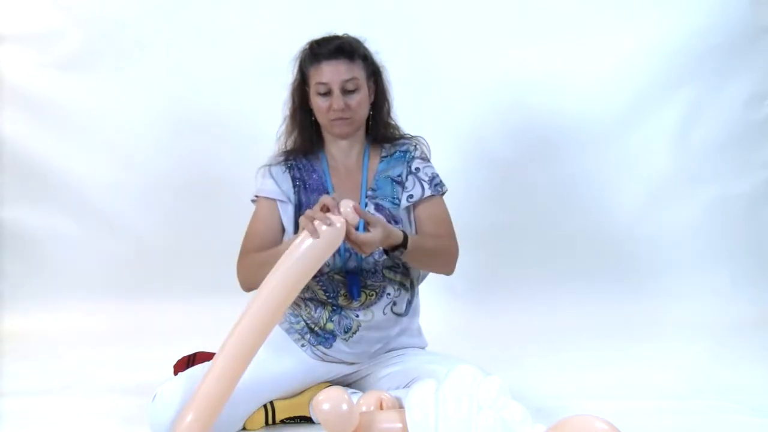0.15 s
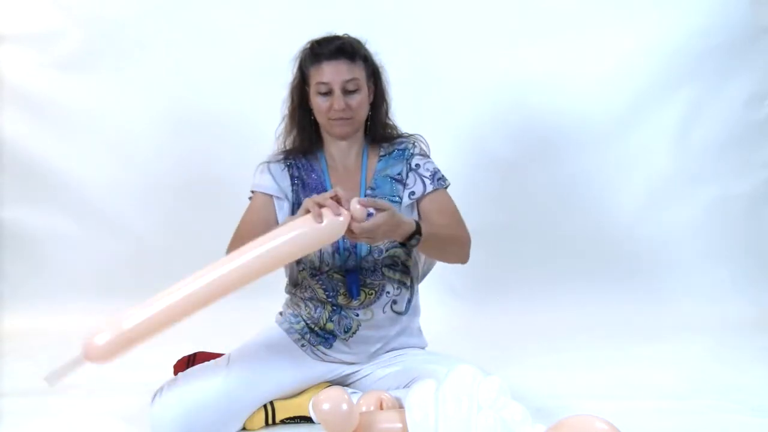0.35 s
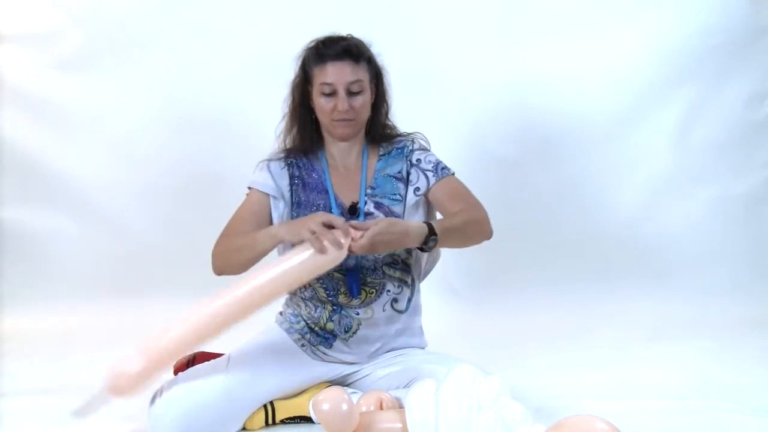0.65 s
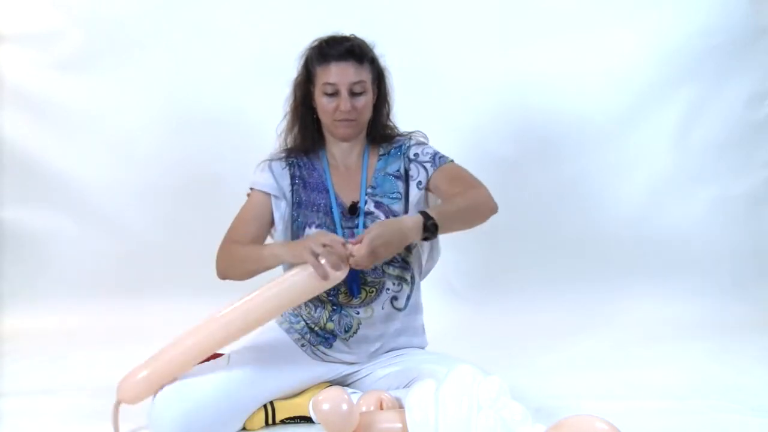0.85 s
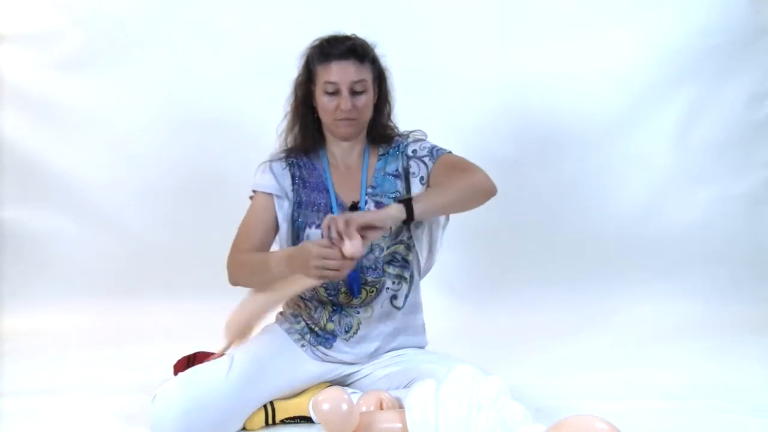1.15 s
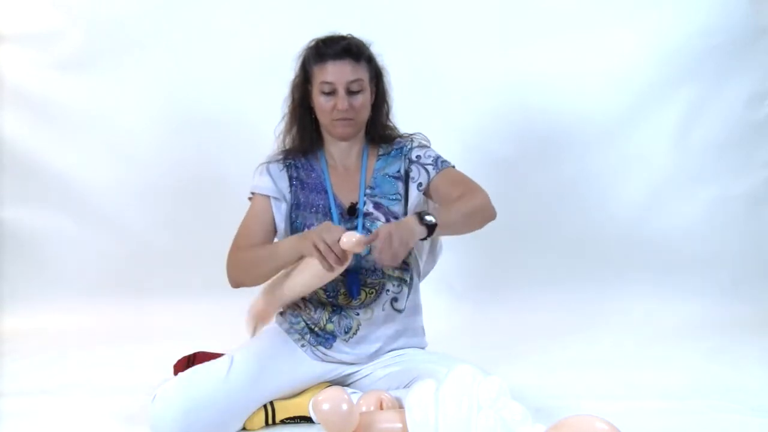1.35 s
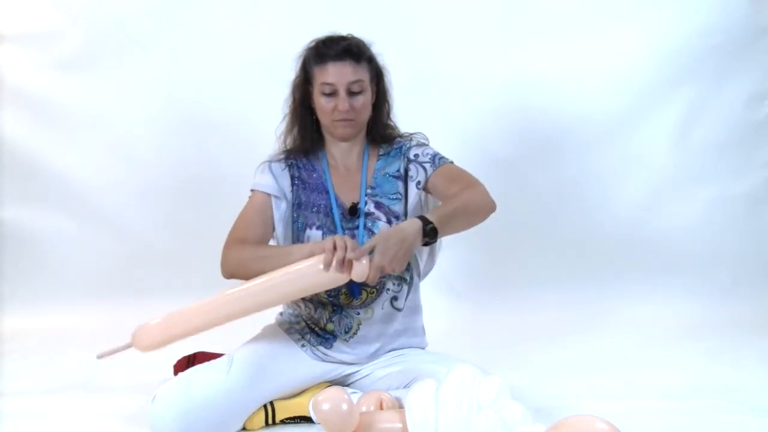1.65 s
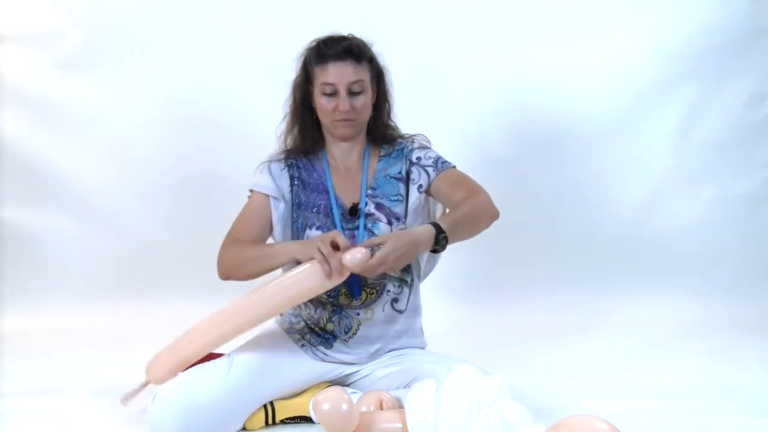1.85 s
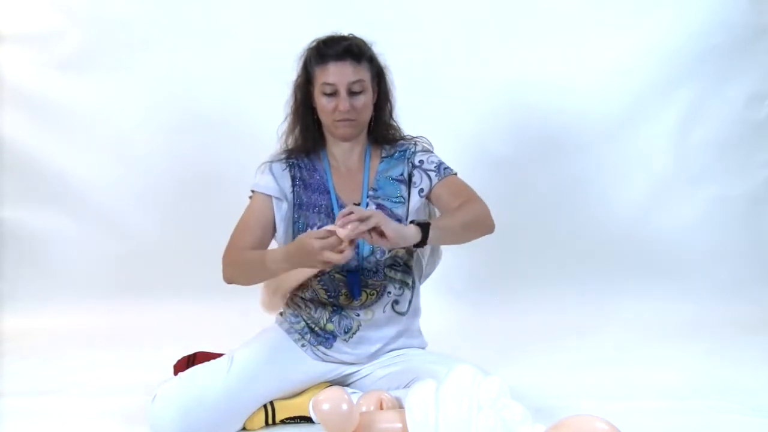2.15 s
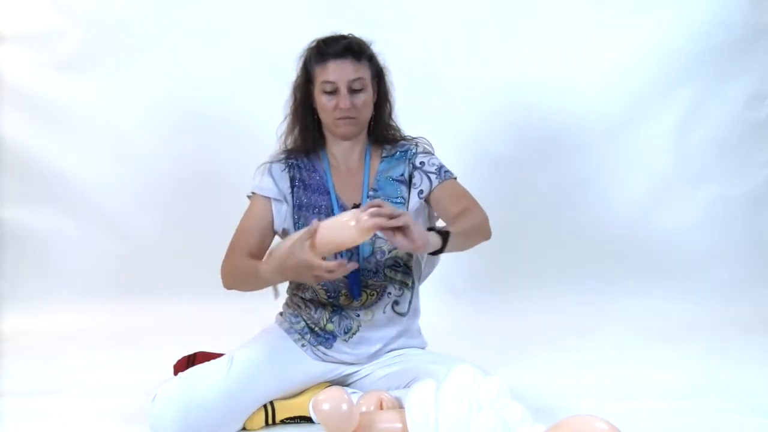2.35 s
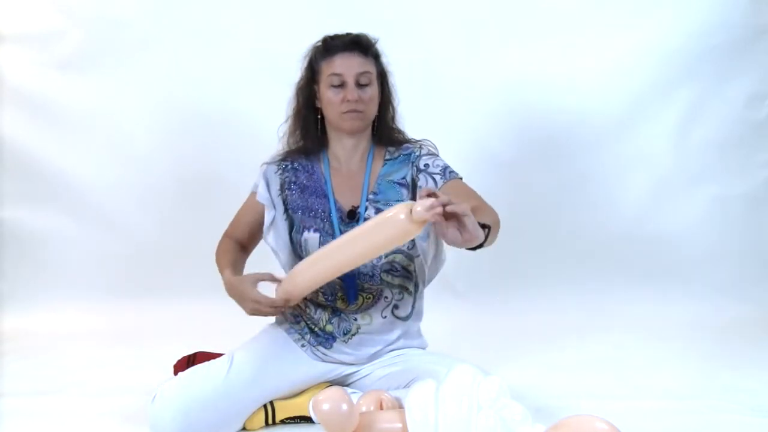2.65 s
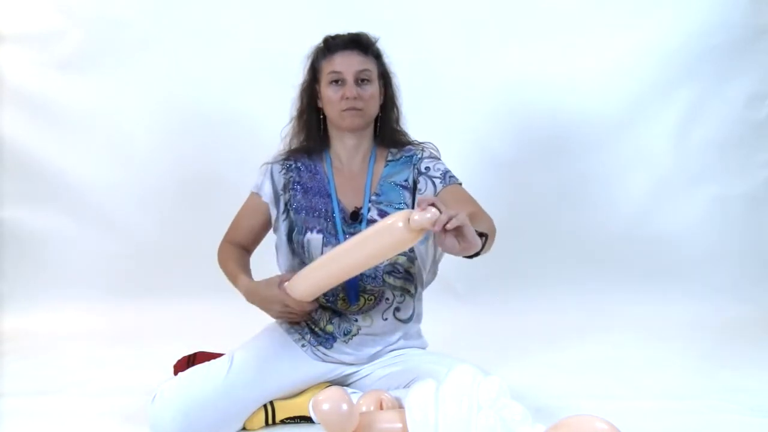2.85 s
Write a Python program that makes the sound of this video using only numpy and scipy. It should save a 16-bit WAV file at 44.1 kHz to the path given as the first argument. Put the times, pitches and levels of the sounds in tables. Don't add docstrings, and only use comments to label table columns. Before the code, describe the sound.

Fingers twisting a taut rubber balloon: slow creaks, hard snaps, soft thumps and brief late squeaks

```python
import sys
import numpy as np
from scipy import signal
from scipy.fft import rfft, irfft
from scipy.io import wavfile
from scipy.ndimage import uniform_filter1d

SR = 44100
rng = np.random.default_rng(int(sys.argv[2]) if len(sys.argv) > 2 else 0)


def field_ratio(decibels):
    return 10 ** (np.asarray(decibels, dtype=float) / 20)


def persist_wave(psi):
    counts = np.round(np.clip(psi, -1, 1) * 32767).astype(np.int16)
    wavfile.write(sys.argv[1], SR, np.atleast_2d(counts).T)


N = 132300


def walk(rate):
    hold = int(SR / rate)
    steps = np.repeat(rng.standard_normal(N // hold + 1), hold)
    return 1.3 * uniform_filter1d(uniform_filter1d(steps, hold), hold)[:N]


def ring(t, hz, t60, rise):
    t = np.maximum(t, 0)
    return np.sin(2 * np.pi * hz * t) * np.exp(-np.log(1000) * t / t60) * (1 - np.exp(-t / rise))


# [f/Hz, level/dB per Hz]
AIR_COLOUR = [
    (18, -48),
    (30, 13),
    (486, -29),
    (5040, -7),
    (8980, -4),
    (12500, -12),
    (16000, -34),
]


def air():
    f = np.arange(N // 2 + 1) * SR / N + 1
    hz, db = np.array(AIR_COLOUR).T
    colour = field_ratio(np.interp(np.log(f), np.log(hz), db))
    x = irfft(rfft(rng.standard_normal(N)) * colour, N)
    return x / x.std() * field_ratio(-54.5)


# [t/s, low mode f/Hz, low mode level/dB, high mode f/Hz]
GRIP = [(0, 670, -1.5, 3130), (.6, 820, -25.5, 2690), (.86, 470, -12.5, 2530), (1.0, 417, -28, 2490),
        (1.2, 650, -16, 2830), (1.7, 740, -28, 2360), (2.05, 740, -52, 2910), (2.45, 744, -13, 2750)]
# [f/Hz, level/dB, t60/s]
BELLY = [(1900, 3, .0016)]
# [f/Hz, level/dB, t60/s]
TREBLE = [(3963, -6, 0.0099), (5330, -1, 0.0049), (6310, 3, 0.0022), (9290, -4.5, 0.0039),
          (10740, -17.5, 0.0029), (14200, -26, 0.00097)]


def slips(s, db, hz, treble_db, loose, size=640):
    rise_s, ring_cycles = .00012, 8
    turns_s = .86
    at, k = np.floor(s * SR).astype(int), np.arange(size)
    t = (k - (s * SR - at)[:, None]) / SR
    vary = rng.standard_normal((len(s), 24)) * loose
    patch_hz = (hz * (1 + .03 * vary[:, 0]))[:, None]
    x = -ring(t, patch_hz, ring_cycles / patch_hz, rise_s)

    grip_s, *grip = np.array(GRIP).T
    low_hz, low_db, high_hz = (np.interp(s, grip_s, column) for column in grip)
    modes = [(low_hz, low_db, .0064), (high_hz, -10.5, .0063)] + BELLY + TREBLE
    for j, (mode_hz, mode_db, t60) in enumerate(modes):
        lift_db = mode_db + 3 * vary[:, 1 + j] + (treble_db if j > 2 else 0)
        n = size if j < 3 else size // 2
        tuned_hz = (mode_hz * (1 + .08 * vary[:, 12 + j]))[:, None]
        x[:, :n] -= field_ratio(lift_db)[:, None] * ring(t[:, :n], tuned_hz, t60, rise_s)

    push = np.where(s < turns_s, 1, -1)
    x *= (push * field_ratio(db) / np.abs(x).max(axis=1))[:, None]
    return np.bincount((at[:, None] + k).ravel(), x.ravel(), N + size)[:N]


# [t/s, level/dB]
SLIDING = [(0, -30), (.35, -28), (.62, -25), (0.782, -23), (.82, -36.5), (.86, -27.5), (1.1, -20),
           (1.13, -24.5), (1.29, -25), (1.44, -37), (1.64, -41), (1.96, -26.5), (2.1, -31), (2.301, -17.5),
           (2.399, -35.5), (2.6, -40.5), (2.7, -36.5), (2.8, -45)]


def rustle():
    scatter_db, spread = 6, .4
    c = rng.random((4800, 3))
    place = (np.arange(len(c)) + 3 * c[:, 0]) / len(c)
    s = place * N / SR % (N / SR)
    db = -scatter_db * np.log(1 - .97 * c[:, 1])
    db = db + 1.5 * walk(90)[(s * SR).astype(int)]
    hz = 1400 * np.exp(spread * 2 * (c[:, 2] - .5))
    fine = slips(s, db, hz, treble_db=-10.5, loose=1.83, size=400)
    return fine / fine.std() * field_ratio(np.interp(np.arange(N) / SR, *np.array(SLIDING).T))


# [t/s, level/dB]
BENDING = [(0, -45), (.5, -47), (.65, -48), (1.1, -53), (1.27, -36), (1.42, -34), (1.6, -54), (2.3, -47.5),
           (2.4, -38), (2.52, -45.5), (2.85, -49.5)]
# [t/s, level/dB, f/Hz]
THUMPS = [(0.758, -16, 152), (1.196, 6, 420), (1.335, -12, 218), (1.351, -3, 195), (1.386, -10, 190),
          (1.404, -7, 250), (1.458, 2.5, 259), (2.125, -12.5, 239), (2.342, 4.5, 350), (2.43, -19, 221),
          (2.571, -23, 330), (2.884, -25, 93)]


def thumps():
    cycles, rise_s, rumble_db, rumble_hz = 5.96, .0057, -7, 360
    t = np.arange(N) / SR
    band = signal.butter(2, [rumble_hz / 5, rumble_hz], "band", fs=SR, output="sos")
    low = signal.sosfilt(band, rng.standard_normal(N))
    low = low / low.std()
    knocks = 0
    for s, db, hz in THUMPS:
        swing = ring(t - s, hz, cycles / hz, rise_s)
        rumble = field_ratio(rumble_db) * low * ring(t - s, 8, .042, rise_s)
        knocks = knocks + field_ratio(db) * (swing + rumble)
    bending_db = np.interp(t, *np.array(BENDING).T) + 4 * walk(16)
    return knocks + low * field_ratio(bending_db)


CREAK_TREBLE_DB = -10
# [t/s, level/dB]
FIRST_SLOW_CREAK = [(0.0001, -15), (0.0048, -5), (0.0076, -20), (0.0105, -5.0), (0.016, -6.5),
                    (0.0196, -14), (0.0231, -8.5), (0.0287, -10), (0.0351, -5.5), (0.041, -10.5),
                    (0.0461, -5.5), (0.05, -8.5), (0.0541, -10), (0.0574, -11), (0.062, -10), (0.0651, -14),
                    (0.0711, -10.0), (0.0758, -7), (0.0793, -9), (0.0852, -8), (0.095, -11), (0.0981, -8),
                    (0.1019, -9), (0.1053, -6), (0.1092, -8), (0.1134, -9), (0.1165, -27), (0.1193, -8),
                    (0.1218, -9), (0.1271, -9), (0.133, -10), (0.136, -9), (0.14, -6), (0.1448, -2),
                    (0.1499, -34), (0.1526, -7.5), (0.1579, -7), (0.1643, -9), (0.1677, -18), (0.1726, -3),
                    (0.176, -4.0), (0.1835, -9), (0.1886, -15), (0.1878, -22), (0.1901, -15)]
# [t/s, level/dB]
SECOND_SLOW_CREAK = [(0.867, -14), (0.872, -0.5), (0.8752, -9), (0.8781, -7), (0.8815, -7), (0.8855, -2),
                     (0.8893, -3.5), (0.893, -3), (0.8966, -3.0), (0.9004, -3.0), (0.905, -4), (0.9084, -6),
                     (0.911, -1), (0.9148, -5.5), (0.9179, -6), (0.9253, -6), (0.9295, -5), (0.9324, -5.5),
                     (0.9368, -8), (0.9386, -12), (0.941, -9), (0.9439, -5), (0.9476, -7), (0.9509, -6),
                     (0.9542, 1.5)]


def slow_creaks():
    out = 0
    for rows, hz, lift_db in (FIRST_SLOW_CREAK, 1400, 1.5), (SECOND_SLOW_CREAK, 1356, 3):
        s, db = np.array(rows).T
        out = out + slips(s, db + lift_db, hz + 0 * s, CREAK_TREBLE_DB, loose=.44)
    return out


# [t/s, level/dB, ring f/Hz]
FIRST_TWIST = [(0.209, 1.5, 1120), (0.2185, -10, 800), (0.2222, -12, 830), (0.239, -2, 900),
               (0.2504, -6, 1740), (0.2678, -17, 1440), (0.2595, -5.5, 1210), (0.2799, -1, 1500),
               (0.2947, 0, 1840), (0.3083, -6, 1830), (0.3233, -6, 1850), (0.3365, 2.5, 1670),
               (0.3522, -8.5, 1050), (0.359, -5, 880), (0.3673, -3.5, 1890), (0.3736, -1, 1800),
               (0.3835, 6, 1700), (0.4007, 0.5, 890), (0.391, -17, 710), (0.4186, 0.5, 1770),
               (0.4425, -7, 1600), (0.4312, 4, 760), (0.4562, 1.5, 1600), (0.4754, 4.5, 1650),
               (0.502, 6, 1330), (0.5142, 0.5, 790), (0.5236, 0.5, 1330), (0.5397, 6.5, 1010),
               (0.5583, -1, 1050), (0.5677, 4.5, 890), (0.574, 1.5, 930), (0.5815, -5, 830),
               (0.5887, 2.5, 1050), (0.6004, -2, 1080), (0.6071, 1, 960)]
# [t/s, level/dB, ring f/Hz]
SECOND_TWIST = [(0.627, -4, 1500), (0.644, -1.5, 1650), (0.6606, -5, 1010), (0.666, -10, 1070),
                (0.674, -9, 1700), (0.6864, -10, 1040), (0.6993, -10, 1280), (0.7101, -7.5, 1120),
                (0.8662, -3.5, 2620), (0.872, -0.5, 2660), (1.127, -6, 2340), (1.1337, -9.5, 2520),
                (1.2359, -4.5, 1320), (1.249, -9.5, 1450), (1.2608, -7, 1550), (1.268, -6.5, 2260),
                (1.3592, -12, 835), (1.3874, -8, 1010), (1.3926, -6, 1340), (1.407, -7.5, 1100),
                (1.4175, -9, 2430), (1.6419, -11.5, 1820), (1.673, -41, 1510), (1.6889, -10.5, 1710),
                (1.6975, -12, 1540), (1.741, -15, 1750), (1.7869, -10.5, 1880), (1.7908, -9.5, 1920),
                (1.8166, -12, 2000), (1.823, -8, 2080)]
# [t/s, level/dB, ring f/Hz]
LAST_TWIST = [(2.0059, -10, 1040), (2.0188, -9, 980), (2.0672, -1, 940), (2.2568, -9, 2470),
              (2.2769, -14, 710), (2.3165, -2.5, 2420), (2.3268, -11, 690), (2.3469, -13, 690),
              (2.4255, -7, 1700), (2.4412, -7, 1530), (2.4577, -8.5, 815), (2.4614, -5.5, 1460),
              (2.4736, -11.5, 1510), (2.5019, -8, 1180), (2.517, -6, 2270), (2.521, -9.5, 1150),
              (2.537, -9.5, 1490), (2.5747, -20, 980), (2.663, -14, 1640), (2.67, -14.5, 1090),
              (2.677, -15, 1010), (2.6994, -16, 1530), (2.713, -18, 1720), (2.717, -21, 1200),
              (2.7279, -17.5, 1450), (2.7394, -24, 1340), (2.7962, -18.5, 1250), (2.8024, -15, 2620)]


def snaps():
    out = 0
    for rows, treble_db in (FIRST_TWIST, -18), (SECOND_TWIST, -11), (LAST_TWIST, -11):
        s, db, hz = np.array(rows).T
        lag_s = .000689 + .001195 * rng.random(len(s))
        hard = slips(s, db, hz, treble_db, loose=1)
        weak = slips(s + lag_s, db - 5, hz, treble_db, loose=1.3)
        out = out + hard + weak
    return out


# [start t/s, end t/s, slips per s, level/dB, ring f/Hz]
CREAKS = [(0.468, 0.5, 460, -13, 1750), (0.612, 0.625, 320, -12, 920), (0.731, 0.791, 520, -16, 1240),
          (0.956, 1.027, 400, -5, 1240), (1.023, 1.077, 342, -5, 1400), (1.072, 1.118, 410, -4, 2600),
          (1.198, 1.226, 400, -11, 704), (1.188, 1.231, 232, -5.5, 1720), (1.318, 1.358, 314, -12, 1647),
          (1.688, 1.734, 438, -15.5, 1680), (1.83, 1.849, 430, -12.5, 2140),
          (1.846, 1.877, 610, -14.5, 2240), (1.881, 1.927, 810, -11.5, 1400),
          (2.0681, 2.0736, 1530, -3, 2950), (2.178, 2.195, 390, -12, 1460),
          (2.205, 2.254, 420, -11.5, 1400), (2.288, 2.337, 540, -10.5, 1400),
          (2.8245, 2.8311, 410, -13, 1040), (2.92, 2.941, 790, -19, 1980), (2.929, 2.971, 370, -26, 1460),
          (1.508, 1.51, 550, -1.5, 2230)]


def creaks():
    jitter, scatter_db = .18, 2
    swell_db, swells_from_per_s = 7, 420
    out = 0
    for t0, t1, rate, db, hz in CREAKS:
        c = rng.standard_normal((60, 2))
        gaps = np.exp(jitter * c[:, 0]) / rate
        s = t0 + np.cumsum(gaps) - gaps[0]
        along = (s - t0) / (t1 - t0)
        db = db - swell_db * (rate > swells_from_per_s) * (2 * along - 1) ** 2
        db = np.where(s < t1, db + scatter_db * c[:, 1], -200)
        out = out + slips(s.clip(0, 2.99), db, hz * (1 + 2 * (s - t0)), CREAK_TREBLE_DB, loose=.55)
    return out


# [start t/s, end t/s, first f/Hz, last f/Hz, level/dB]
SQUEAKS = [
    (2.141, 2.164, 1150, 1450, -14),
    (2.258, 2.278, 1090, 1260, -17),
    (2.277, 2.3, 1480, 1420, -15),
    (2.203, 2.25, 780, 900, -24),
    (2.921, 2.937, 700, 1250, -27),
]
SQUEAK_FALL_DB = -5.5, -14, -14, -9, -9


def squeaks():
    out, t = 0, np.arange(N) / SR
    for (t0, t1, hz0, hz1, db), fall_db in zip(SQUEAKS, SQUEAK_FALL_DB):
        u = ((t - t0) / (t1 - t0)).clip(0, 1)
        hz = (hz0 + (hz1 - hz0) * u) * (1 + .04 * walk(500))
        phase = 2 * np.pi * np.cumsum(hz) / SR
        stack = 0
        for k in range(7):
            partial_db = fall_db * k - 1 + 1.5 * walk(300)
            stack = stack + field_ratio(partial_db) * np.sin((k + 1) * phase)
        swell = np.minimum(np.minimum(u / .6, (1 - u) / .12), 1)
        out = out + field_ratio(db) * swell * stack
    return out


def room(near):
    t60_s, dull_hz = .13, 4560
    t = np.arange(SR // 3) / SR
    tail = rng.standard_normal(len(t)) * np.exp(-np.log(1000) * t / t60_s) * (t > .002)
    tail = signal.sosfilt(signal.butter(1, dull_hz, fs=SR, output="sos"), tail)
    return field_ratio(-18) * signal.fftconvolve(near, tail / np.linalg.norm(tail))[:N]


def scene():
    skin = rustle() + slow_creaks() + snaps() + creaks() + squeaks()
    thin = signal.butter(2, 340, "high", fs=SR, output="sos")
    near = signal.sosfiltfilt(thin, skin) + thumps()
    return (near + room(near) + air())[None]


def roll_off(x):
    return signal.sosfilt(signal.butter(12, 16360, fs=SR, output="sos"), x)


def record(dry):
    limit = 1.02
    mix = limit * np.tanh(dry / limit)
    return roll_off(mix)


dry = scene()
out = record(dry)
persist_wave(out)
```